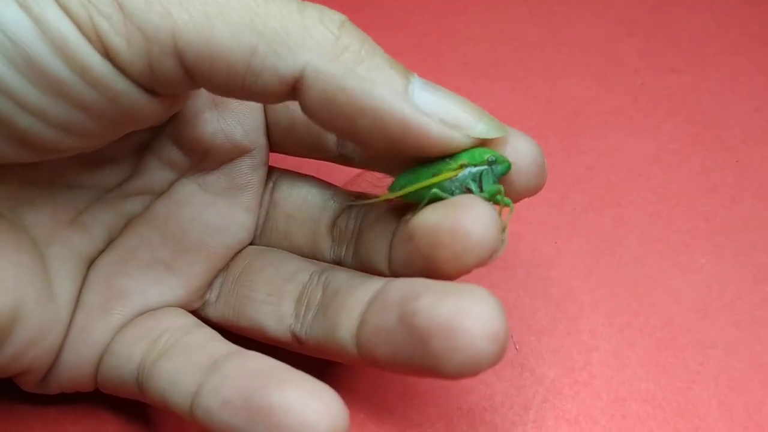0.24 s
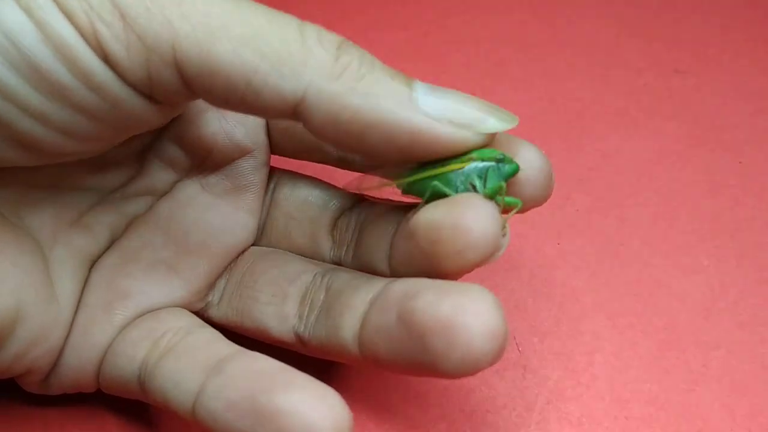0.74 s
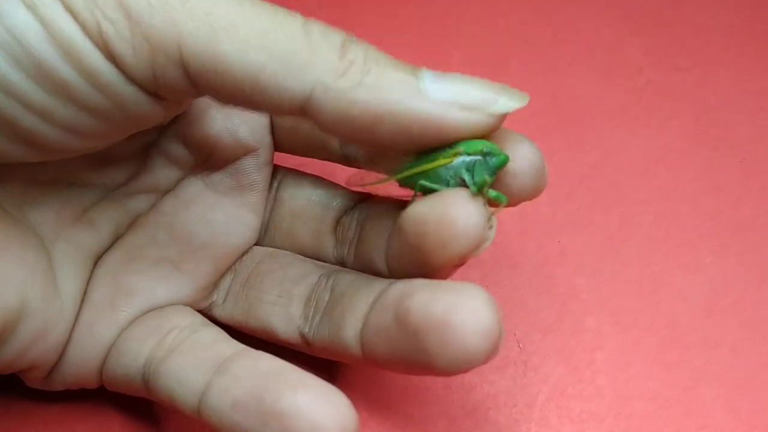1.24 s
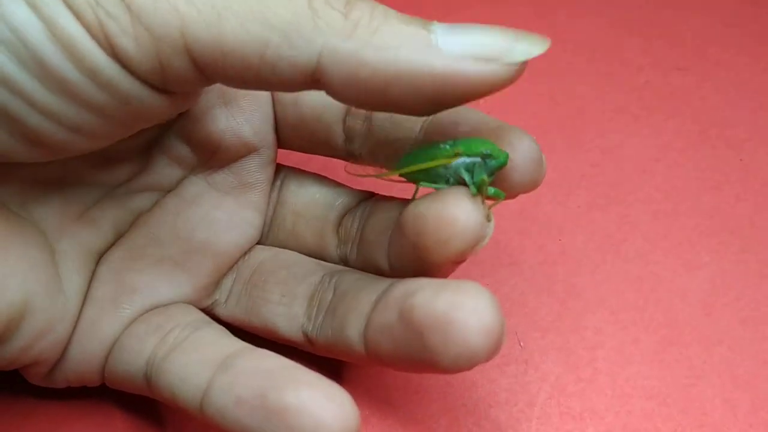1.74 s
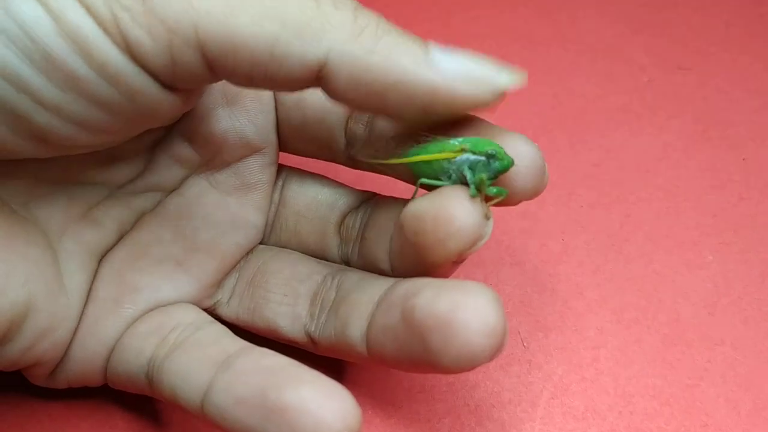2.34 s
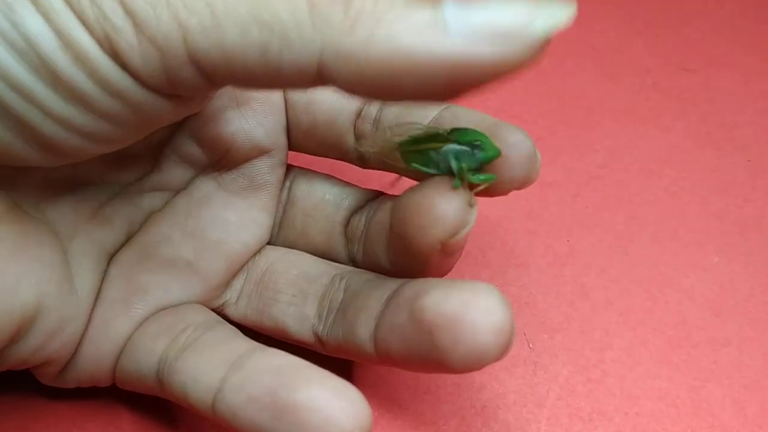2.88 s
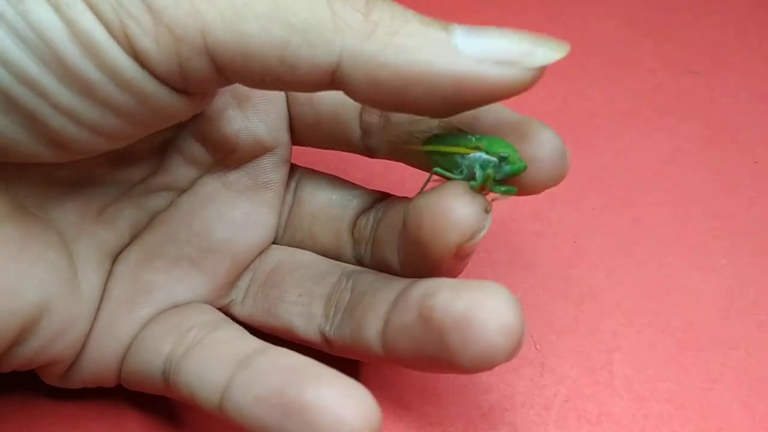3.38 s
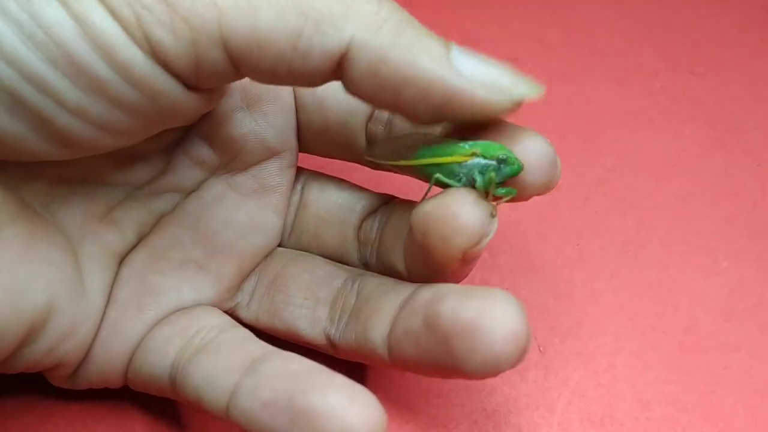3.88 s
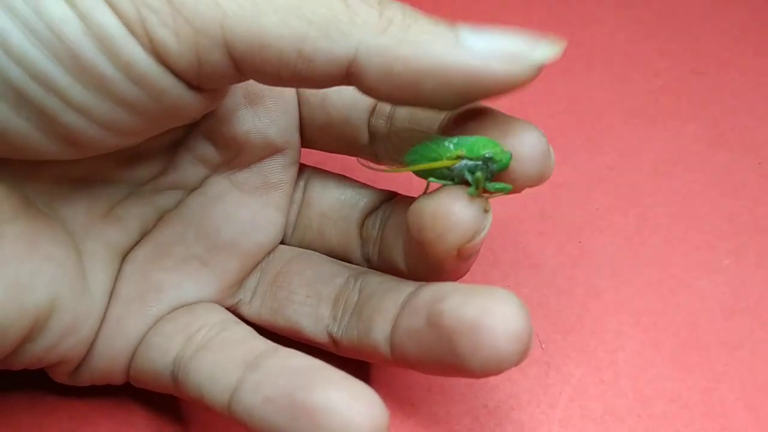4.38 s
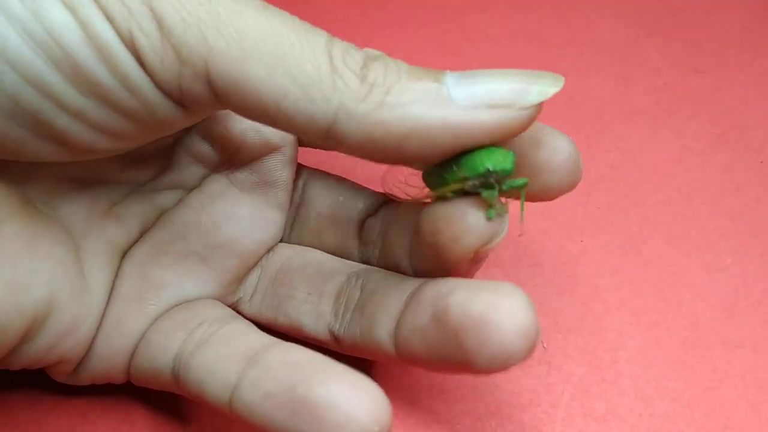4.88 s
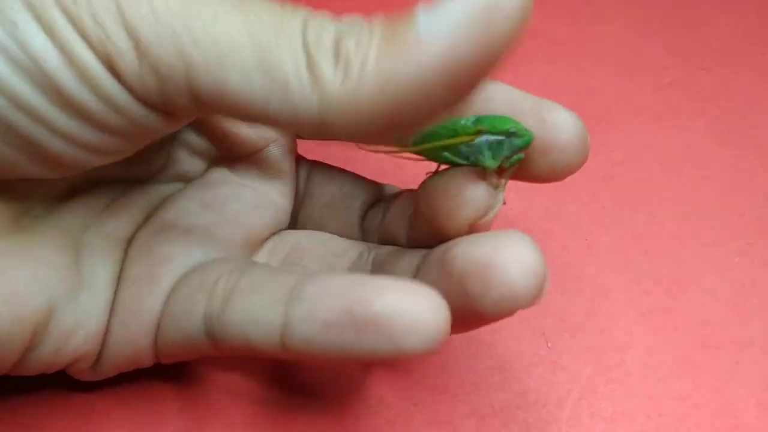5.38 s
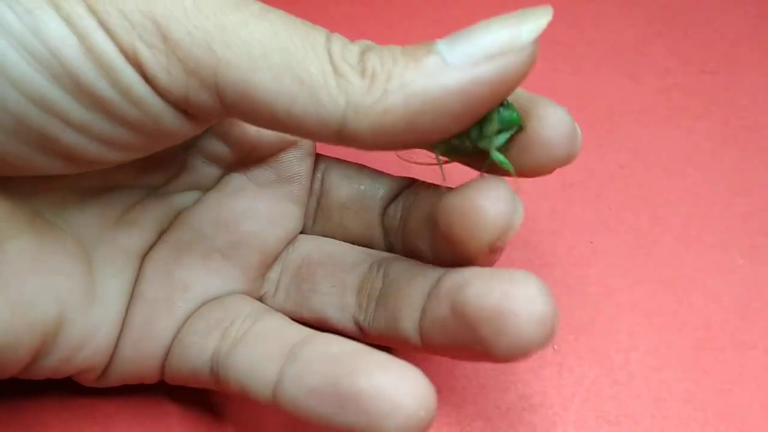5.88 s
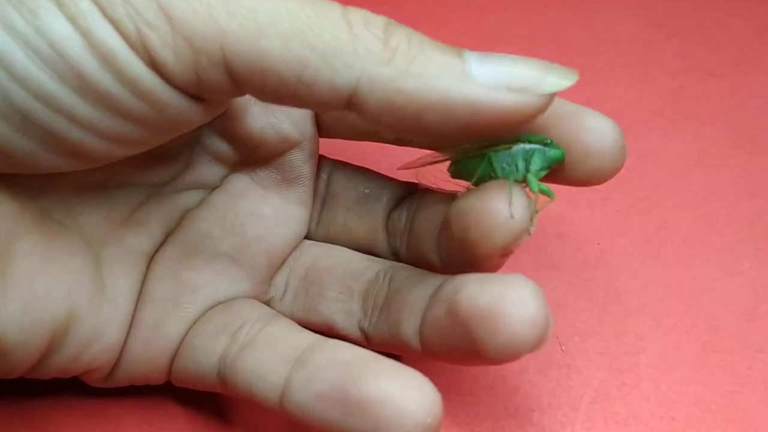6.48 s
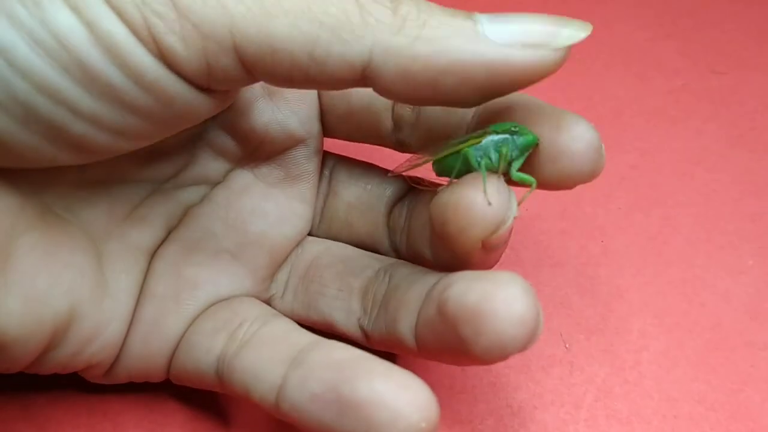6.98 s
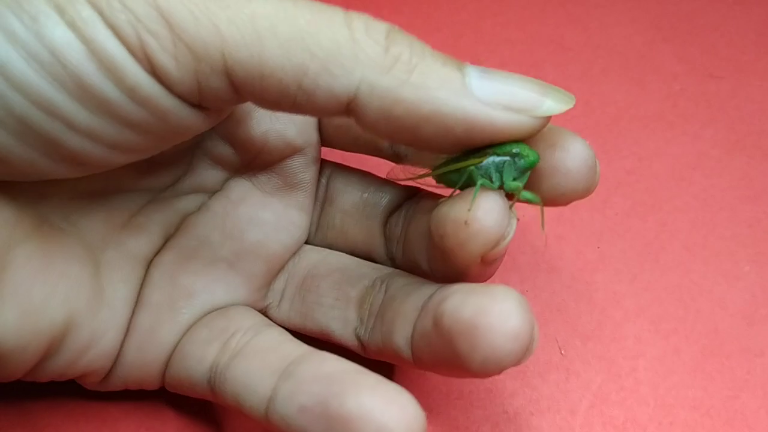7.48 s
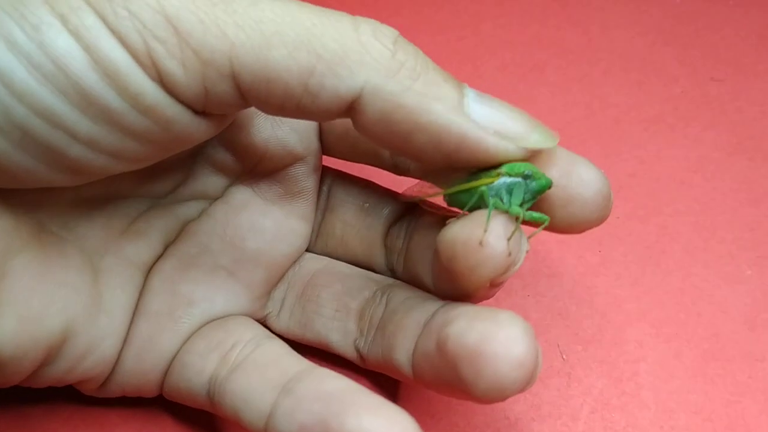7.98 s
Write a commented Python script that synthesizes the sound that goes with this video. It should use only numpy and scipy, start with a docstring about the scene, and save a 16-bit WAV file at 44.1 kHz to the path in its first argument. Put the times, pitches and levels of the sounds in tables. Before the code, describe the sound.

Very close, loud insect buzzing: a bright, piercing rattle of rapid clicks, strongest in the high treble, with almost no bass. It begins at once as a continuous call, breaks into choppy runs after a few seconds, and ends as scattered short chirring bursts. Small-room reflections blur each stop. Faint rumble, hiss and barely noticeable distant tones lie underneath, and automatic gain lifts the room during pauses.

```python
"""Quiet, bare room, about 8 s, with a microphone pair close to a cicada held between two fingers.
From the start: noise rumble and faint hiss; at once two tymbals buzz in turn, some 140 strokes a second.
Rib clicks, then two weaker spring-back clicks, ring the body; noise-like echoes answer from the room.
A soft far tone comes early, others near 2, 6.6 and 7.8 s; from 2.6 s the buzz breaks up, with longer pauses
late on. The recorder's gain control lifts the room in those pauses."""
import sys
import numpy as np
from scipy import signal
from scipy.io import wavfile
from scipy.ndimage import uniform_filter1d, minimum_filter1d

SR = 44100
rng = np.random.default_rng(int(sys.argv[2]) if len(sys.argv) > 2 else 0)


def int16_out(signal):
    """Quantize to a 16-bit WAV file."""
    q = np.round(np.clip(np.atleast_2d(signal).T, -1, 1) * 32767)
    wavfile.write(sys.argv[1], SR, q.astype(np.int16))


N = 362943

# room rumble with faint shrill bands, relative: f/Hz, level/dB per Hz
RUMBLE_SPECTRUM = [(18, -63), (30, -55), (191, -0.5), (257, -2), (443, -9.5), (540, -9), (864, -13),
                   (1860, -12), (2380, -16), (2830, -16), (3440, -64), (4990, -28), (5650, -44),
                   (8810, -12), (11000, -46), (14300, -76), (22000, -120)]
# how alike the rumble is at the two microphones: f/Hz, likeness [-1 to 1]
RUMBLE_LIKENESS = [(60, 0.53), (180, 0.99), (550, 0.67), (1650, 0.096), (4970, 0.056), (15000, 0.05)]
# bursts of even strokes; a pause, stumble or change of pace starts a new one:
# first stroke t/s, last stroke t/s, strokes [count], leading tymbal begins [1 or 0], relative level/dB
BURSTS = [(0.0007, 0.9612, 134, 1, -8.9), (0.9705, 1.3889, 59, 1, -8.8), (1.3962, 2.0391, 89, 0, -9.1),
          (2.0546, 2.5966, 75, 0, -8.4), (2.6132, 2.6281, 3, 0, -8.0), (2.6442, 2.6442, 1, 1, -7.9),
          (2.6574, 2.8212, 23, 0, -8.2), (2.8404, 2.9582, 17, 0, -7.4), (2.9751, 3.2294, 36, 0, -8.2),
          (3.2381, 3.3983, 23, 0, -8.4), (3.4065, 3.7113, 42, 1, -7.9), (3.7203, 4.104, 54, 1, -8.0),
          (4.1412, 4.1457, 2, 1, -7.0), (4.1625, 4.2949, 19, 0, -7.9), (4.3235, 4.3235, 1, 1, -6.9),
          (4.3504, 4.4989, 21, 0, -7.3), (4.6493, 4.7405, 13, 0, -7.9), (4.9745, 4.9745, 1, 1, -7.8),
          (4.9901, 5.1218, 19, 0, -8.0), (5.1771, 5.1771, 1, 1, -9.3), (5.2161, 5.3471, 19, 0, -8.6),
          (5.5481, 5.7713, 32, 0, -8.0), (5.7867, 6.0965, 46, 1, -7.7), (6.1064, 6.1683, 10, 1, -7.7),
          (6.1782, 6.1856, 2, 1, -8.2), (6.2233, 6.294, 11, 0, -7.5), (6.374, 6.3886, 3, 0, -8.5),
          (6.4051, 6.5179, 17, 0, -9.0), (6.6255, 6.6417, 3, 0, -8.2), (6.6997, 6.7246, 4, 0, -8.2),
          (6.7304, 7.046, 46, 0, -8.9), (7.1542, 7.2916, 20, 0, -8.6), (7.3097, 7.3256, 3, 1, -8.1),
          (7.3831, 7.4191, 6, 1, -7.7), (7.4737, 7.5278, 8, 0, -8.0), (7.6347, 7.6571, 4, 1, -8.6),
          (7.6922, 7.7414, 7, 0, -8.6), (7.9279, 8.0132, 13, 0, -8.6), (8.1806, 8.1902, 2, 1, -7.5)]
# body resonances, relative levels: f/Hz, width f/Hz, direct level/dB, level into the room/dB,
# rib that drives it most [rib number from 0], reach along the ribs [ribs]
BODY_RESONANCES = [(2996, 523, -26, -13, 1.54, 1.3), (3580, 1270, -21, -20.5, 1.9, 5.3),
                   (4423, 643, -6, -6.5, 2.0, 0.57), (4857, 660, -6, -4, 1.0, 0.32),
                   (5600, 930, -3, -44, 0.36, 1.41), (6492, 620, -9.5, -6, 0.49, 1),
                   (7070, 1630, -19.5, -7.5, 0.87, 1.18), (8320, 530, -15.5, -10, 0.61, 0.42),
                   (9100, 2250, -19, -5.5, 1.4, 0.7), (9790, 1000, -19.5, -9, 2.3, 1.02),
                   (11280, 1100, -23, -19.5, 0.79, 0.6), (12400, 930, -22.5, -15.5, 1.2, 0.35),
                   (15200, 2400, -15, -4, 0.74, 0.42)]
# rib strengths along a stroke, relative level/dB:
# the leading tymbal (after the long gap) sounds from its first rib and grows to its last
LEADING_RIBS_DB = [-5.5, -2.5, 0, 1.5]
# rib strengths along a stroke, relative level/dB:
# the other tymbal starts one rib later, peaks at the third and eases off
TRAILING_RIBS_DB = [-65, -3, -1, -5]
# spring-back clicks, relative: f/Hz, level/dB per click
SPRING_BACK_SPECTRUM = [(3000, -21), (5500, -21), (6500, -15), (8000, -12), (16000, -13)]
# mean delays of the two spring-back clicks after the stroke: t/ms
SPRING_BACK_MS = [2.8, 3.8]
# beaming of each resonance, in body order: left minus right level/dB
LEFT_MORE_DB = [-6, -3, 15, -9, 0, -2, -4, 6, -3, -2, -3, 0, -2]
# lag of the right microphone for each resonance, in body order: lag [samples]
RIGHT_LAG = [15, 11, 11, 12, 10, 8, 12, 8, 8, 12, 10, 9, 9]
# the grip shifts: t/s, lowest resonances left minus right level/dB, 5-6 kHz level/dB, treble level/dB
GRIP = [(0.0, 18, 1, 4.5), (0.7, 12.5, 0, 3), (2.0, 9, -0.5, 2.5), (3.0, 6, 1, 3), (4.1, 5, 0, 2),
        (4.95, -5, 6, 8.5), (5.5, 1, 0, 1.5), (6.3, 3, -2, 4), (7.0, -4.5, -1.5, 4), (8.23, -1, -1.5, 6.5)]
# faint far-off tones: start t/s, length t/s, mean f/Hz, peak level/dB
FAR_TONES = [(0.072, 0.26, 520, -62.5), (2.118, 0.12, 498, -60.5), (6.59, 0.16, 830, -63),
             (7.783, 0.078, 664, -63)]

RUMBLE_START_DB, RUMBLE_RISE_DB_PER_S, RUMBLE_PATCHY_DB, HISS_DB = -60, 0.4, 4, -61
# the leading tymbal comes late, more so as the call wears on, and is louder
LIMP_MS, LIMP_MS_PER_S, LEADING_LOUDER_DB = 0.6, 0.08, 1.7
RIB_SPACING_MS, RIB_JITTER_MS, CLICK_SPREAD_DB = 0.4, 0.02, 0.7
SPRING_JITTER_MS, STROKE_JITTER_MS, STROKE_SPREAD_DB = 0.4, 0.12, 0.5
SIDE_SPREAD_DB_PER_KHZ, CALL_DB = 0.2758, -1.5
SCATTER_FROM_HZ, SCATTER_SAMPLES = 6000, 1
LAGGING_BAND_DB, LAGGING_BAND_SAMPLES, OPPOSED_BAND_DB = -35.0, 18, -29
WALL_T60_S, WALL_TREBLE_T60_S, WALL_DB = 0.41, 0.15, -17
NEAR_T60_S, NEAR_DB = 0.038, -12
QUIET_DB, MOST_LIFT_DB, LIFT_SLOPE = -13.5, 7.5, 1   # slope in dB of lift per dB below quiet
LIFT_DB_PER_S, DROP_MS = 106, 1
PEAK_LIMIT, LOOK_AHEAD_SAMPLES, CUTOFF_HZ = 0.9, 90, 16150   # limit as a share of full scale


def from_db(db):
    """Decibels to amplitude gain."""
    return 10 ** (np.asarray(db) / 20)


def rms_one(x):
    """Scale to rms 1."""
    return x / np.sqrt(np.mean(x ** 2) + 1e-20)


def at_hz(points, hz):
    """Read a spectrum on a log-frequency axis."""
    points = np.array(points)
    return np.interp(np.log(hz), np.log(points[:, 0]), points[:, 1])


def filtered(x, order, hz, kind):
    """Butterworth filter."""
    return signal.sosfilt(signal.butter(order, hz, kind, fs=SR, output="sos"), x)


def drift(rate):
    """Slow chance: straight lines between random knots of spread 1, so many knots a second."""
    knots = rng.standard_normal(int(N / SR * rate) + 2)
    return np.interp(np.arange(N) / SR * rate, np.arange(len(knots)), knots)


def rumble():
    """Patchy third-octave bands of stereo noise, most alike at both microphones in the bass; rms 1."""
    out, edges = 0, 30 * 2 ** np.arange(0, 8.6, 1 / 3)
    white = rng.standard_normal((2, 2, N))
    for k, (low, high) in enumerate(zip(edges, edges[1:])):
        mid, side = filtered(white[k % 2], 2, [low, high], "band")
        hz = np.sqrt(low * high)
        alike = np.clip(at_hz(RUMBLE_LIKENESS, hz), -1, 1)
        gain = from_db(at_hz(RUMBLE_SPECTRUM, hz) + RUMBLE_PATCHY_DB * drift(8))
        out = out + gain * (np.sqrt(1 + alike) * mid + np.sqrt(1 - alike) * side * [[1], [-1]])
    return rms_one(out)


def background():
    """Slowly growing rumble, a little stronger on the right, over steady white hiss."""
    growth = from_db(RUMBLE_START_DB + RUMBLE_RISE_DB_PER_S * np.arange(N) / SR)
    room_rumble = growth * rumble() * from_db([[-0.6], [0.6]])
    return room_rumble + from_db(HISS_DB) * rng.standard_normal((2, N))


def strokes():
    """The tymbals pull in turn, unevenly spaced: time, level and whether the leading one, per stroke."""
    times, levels, leading = [], [], []
    for first, last, count, begins, level_db in BURSTS:
        leads = (np.arange(count) + begins) % 2
        late = leads * (LIMP_MS + LIMP_MS_PER_S * first) / 1000
        even = np.linspace(first - late[0], last - late[-1], count)
        times += list(even + late)
        levels += list(level_db + LEADING_LOUDER_DB * (leads - 0.5))
        leading += list(leads == 1)
    return np.array(times), np.array(levels), np.array(leading)


def click_samples(times, chance):
    """Each stroke buckles four ribs in a row, then the plate springs back in two clicks; their samples."""
    ribs_ms = np.arange(len(LEADING_RIBS_DB)) * RIB_SPACING_MS + RIB_JITTER_MS * chance[:, :4]
    spring_ms = SPRING_BACK_MS + SPRING_JITTER_MS * chance[:, 4:6]
    after_ms = np.column_stack([ribs_ms, spring_ms]) + STROKE_JITTER_MS * chance[:, 6:7]
    return np.clip(np.round((times[:, None] + after_ms / 1000) * SR).astype(int), 0, N - 1)


def ring(clicks, hz, width_hz):
    """Clicks pass a resonance twice (plate, then air sac), so the ring swells before it dies; height near 1."""
    r, w = np.exp(-np.pi * width_hz / SR), 2 * np.pi * hz / SR
    stage = [0, np.sin(w), 0, 1, -2 * r * np.cos(w), r * r]
    return 2 * np.e * (1 - r) * signal.sosfilt([stage, stage], clicks + 1e-18)


def body(at, times, leading):
    """Clicks ring every body resonance; returns left, right and room send, and the summed clicks."""
    ribs_db = np.where(leading[:, None], LEADING_RIBS_DB, TRAILING_RIBS_DB)
    rib = np.arange(len(LEADING_RIBS_DB))
    grip_s, *grip = np.transpose(GRIP)
    low_pan_db, shelf_db, treble_db = [np.interp(times, grip_s, column)[:, None] for column in grip]
    out, all_clicks = np.zeros((3, N)), np.zeros(N)
    for k, (hz, width_hz, level_db, room_db, best_rib, reach) in enumerate(BODY_RESONANCES):
        # each resonance hears best the ribs near its own place along the row
        rib_share = from_db(ribs_db) * np.exp(-((rib - best_rib) / reach) ** 2)
        # the spring-back pushes the other way
        spring_share = np.full((len(times), 2), -from_db(at_hz(SPRING_BACK_SPECTRUM, hz)))
        share = np.column_stack([rib_share, spring_share])
        grip_db = shelf_db * (5000 < hz < 6000) + treble_db * (hz > 7000)
        share = share * from_db(grip_db + CLICK_SPREAD_DB * rng.standard_normal(at.shape))
        pan_db = LEFT_MORE_DB[k] + low_pan_db * (hz < 4000)
        clicks = np.zeros((2, N))
        # the higher the mode, the more each side hears the clicks in its own proportions
        for side, sign in zip(clicks, (1, -1)):
            own_db = SIDE_SPREAD_DB_PER_KHZ * hz / 1000 * rng.standard_normal(at.shape)
            slip = rng.integers(-SCATTER_SAMPLES, SCATTER_SAMPLES + 1, at.shape) * (hz > SCATTER_FROM_HZ)
            np.add.at(side, np.clip(at + slip, 0, N - 1), share * from_db(sign * pan_db / 2 + own_db))
        left, right = ring(clicks, hz, width_hz)
        paths = [left, np.roll(right, RIGHT_LAG[k]), (left + right) / 2]
        # neighbouring resonances have opposite sign
        out += (-1) ** k * from_db([[level_db], [level_db], [room_db]]) * paths
        all_clicks += clicks.mean(axis=0)
    return out, all_clicks


def low_bands(out, all_clicks):
    """Steep cut below 2.3 kHz, then two faint click bands: one lags on the right, one is opposite left to right."""
    out = signal.sosfilt(signal.cheby2(6, 36, 2300.0, "high", fs=SR, output="sos"), out)
    lagging = filtered(all_clicks, 3, [1300.0, 2000.0], "band")
    out[:2] += from_db(LAGGING_BAND_DB) * np.array([lagging, np.roll(lagging, LAGGING_BAND_SAMPLES)])
    opposed = filtered(all_clicks, 2, [1800.0, 2600.0], "band")
    out[:2] += from_db(OPPOSED_BAND_DB) * np.array([opposed, -opposed])
    return out


def cicada():
    """Each muscle pull gives a set energy, however the ribs share it; returns left, right and room send."""
    times, levels, leading = strokes()
    chance = rng.standard_normal((len(times), 8))
    at = click_samples(times, chance)
    out = low_bands(*body(at, times, leading))
    starts = np.sort(at.min(axis=1))
    energy = np.add.reduceat(np.mean(out[:2] ** 2, axis=0), starts) / (0.0016 * SR)
    stroke_db = CALL_DB + levels + STROKE_SPREAD_DB * chance[:, 7]
    gain = from_db(stroke_db) / np.sqrt(energy + 1e-9)
    which = np.clip(np.searchsorted(starts, np.arange(N), side="right") - 1, 0, len(starts) - 1)
    # the level glides from stroke to stroke over 16 samples
    return out * uniform_filter1d(np.roll(gain[which], -8), size=16)


def room(x):
    """Dense echoes: a short cloud from hand and table, a long tail from the walls that loses treble first."""
    s = np.arange(SR) / SR
    noise = rng.standard_normal((3, 2, SR))
    low = filtered(noise[0], 2, 6500.0, "low") * from_db(-60 * s / WALL_T60_S)
    high = filtered(noise[1], 2, 6500.0, "high") * from_db(-60 * s / WALL_TREBLE_T60_S)
    walls = (low + high) * np.clip(s / 0.0083, 0, 1)
    near = noise[2] * from_db(-60 * s / NEAR_T60_S) * np.clip(s / 0.0033, 0, 1)
    echoes = from_db(WALL_DB) * rms_one(walls) + from_db(NEAR_DB) * rms_one(near)
    return signal.fftconvolve(x[None], echoes / np.sqrt(SR), axes=1)[:, :N]


def far_tones():
    """Soft sine tones from outside the room, slightly wavering in pitch, each swelling and fading."""
    out = np.zeros(N)
    for start, length, hz, level_db in FAR_TONES:
        swell = np.sin(np.pi * np.clip((np.arange(N) / SR - start) / length, 0, 1))
        cycles = np.cumsum(hz * (1 + 0.01 * drift(12))) / SR
        out += from_db(level_db) * swell * np.sin(2 * np.pi * cycles)
    return out


def scene():
    """Rumble and hiss, the close insect, its echoes in the room and the far tones, at the microphones."""
    bed = background()
    left, right, sent = cicada()
    return bed + np.array([left, right]) + room(sent) + far_tones()


def record(dry):
    """Gain control lifts quiet passages gradually and drops fast; a limiter holds peaks; the top is cut."""
    level_db = 10 * np.log10(uniform_filter1d(np.mean(dry ** 2, axis=0), size=132) + 1e-12)
    wanted_db = np.clip(LIFT_SLOPE * (QUIET_DB - level_db), 0, MOST_LIFT_DB)
    # the running minimum below a ramp limits how fast the lift may rise
    ramp = LIFT_DB_PER_S * np.arange(N) / SR
    lift_db = np.minimum.accumulate(wanted_db - ramp) + ramp
    r = np.exp(-1000 / (DROP_MS * SR))
    lifted = dry * from_db(signal.lfilter([1 - r], [1, -r], lift_db))
    allowed = np.minimum(1, PEAK_LIMIT / (np.abs(lifted).max(axis=0) + 1e-9))
    held = minimum_filter1d(allowed, size=LOOK_AHEAD_SAMPLES)
    limited = lifted * uniform_filter1d(held, size=LOOK_AHEAD_SAMPLES)
    return signal.sosfilt(signal.cheby2(20, 60, CUTOFF_HZ, fs=SR, output="sos"), limited)


dry = scene()
out = record(dry)
int16_out(out)
```